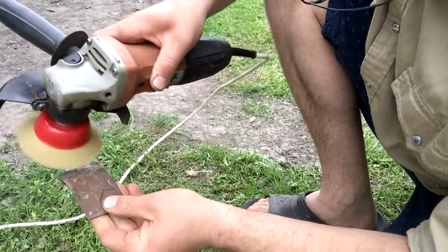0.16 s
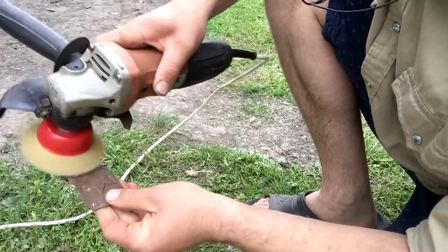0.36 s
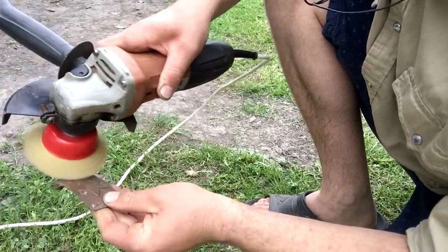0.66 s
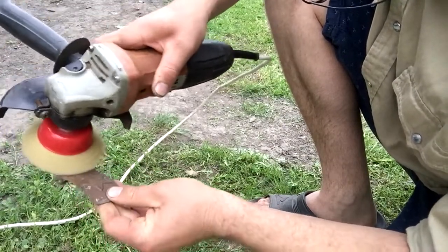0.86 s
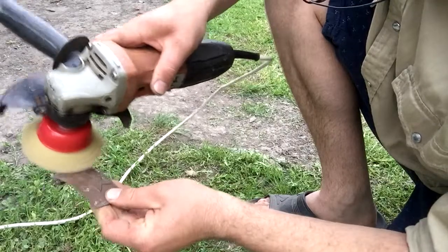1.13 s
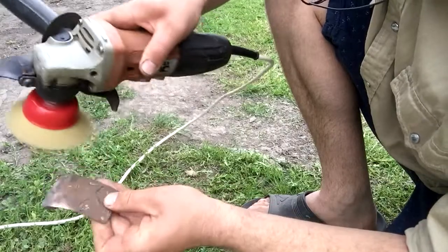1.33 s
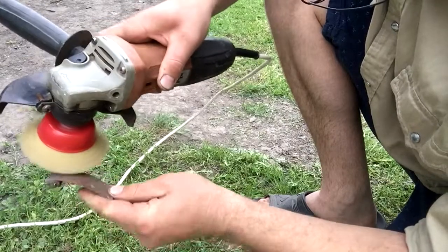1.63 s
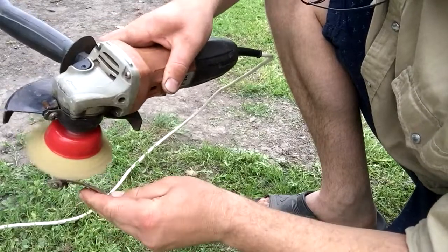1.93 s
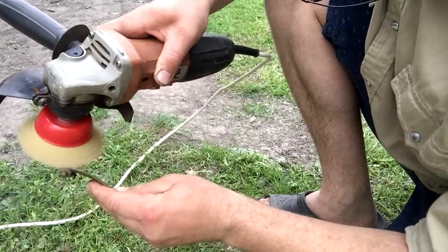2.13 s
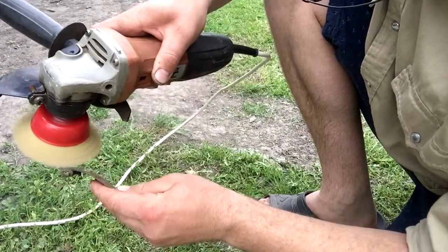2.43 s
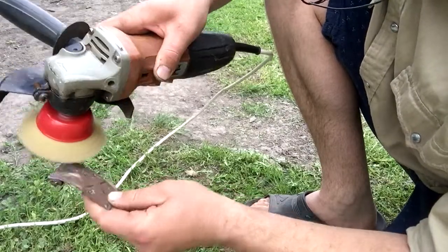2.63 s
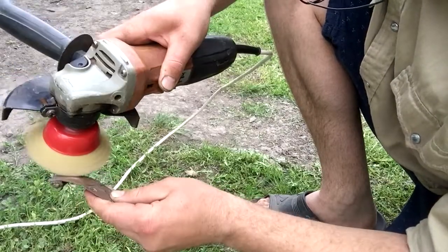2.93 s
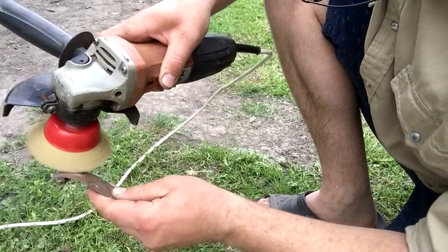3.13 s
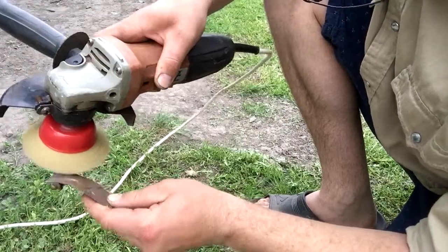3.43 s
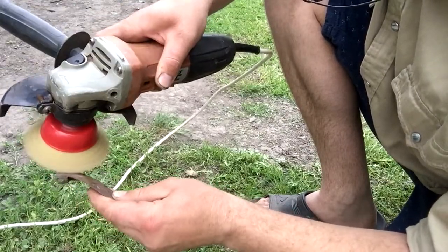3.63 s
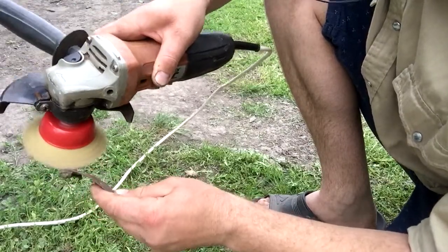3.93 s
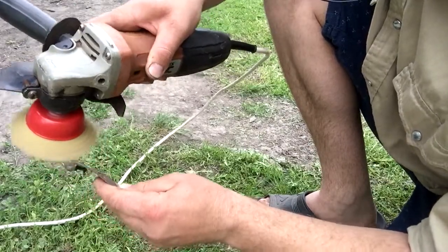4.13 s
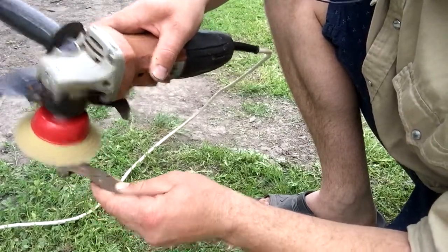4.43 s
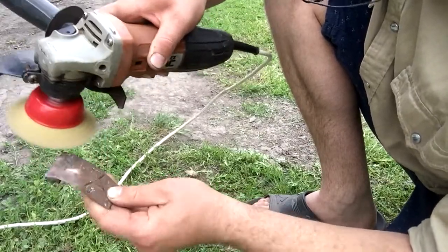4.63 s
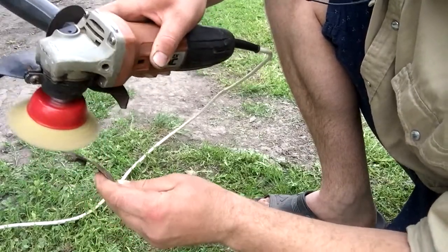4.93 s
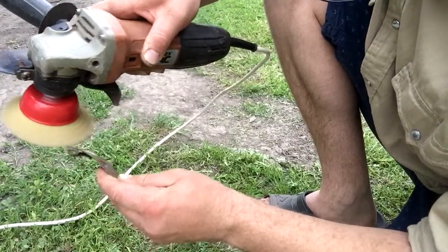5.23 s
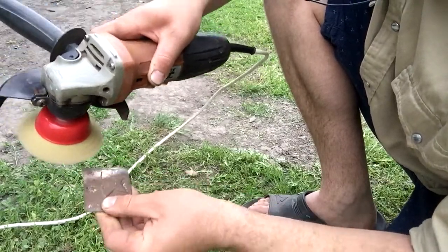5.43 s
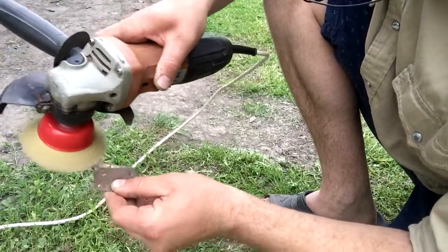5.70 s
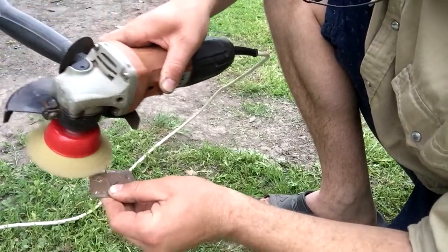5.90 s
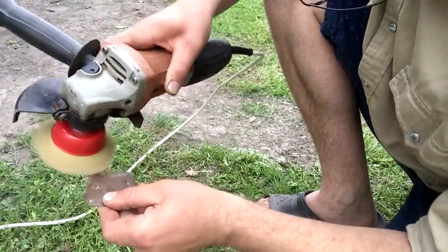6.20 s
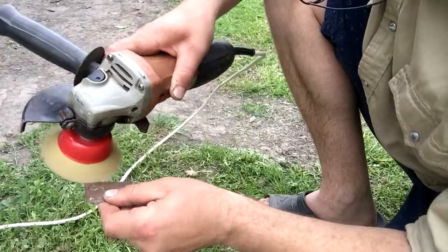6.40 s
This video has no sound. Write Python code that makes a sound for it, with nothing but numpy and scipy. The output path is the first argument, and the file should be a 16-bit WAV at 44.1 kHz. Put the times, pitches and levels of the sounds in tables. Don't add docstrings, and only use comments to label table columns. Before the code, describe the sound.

A power tool with a spinning wire brush scrubs a hand-held metal plate on open grass. The loud, metallic, buzzing whine bends down under load and springs up when released, slowly at first and then in quicker dips. A brief flicker in level comes early on, after which the rough noise is thinner. Dry sound, heard at arm's length, with no echo.

```python
import sys
import numpy as np
from scipy import signal
from scipy.fft import rfft, irfft
from scipy.io import wavfile
from scipy.ndimage import uniform_filter1d

SR = 44100
rng = np.random.default_rng(int(sys.argv[2]) if len(sys.argv) > 2 else 0)


def to_wav(s):
    ch = np.atleast_2d(s).T
    pcm = np.round(np.clip(ch, -1, 1) * 32767)
    wavfile.write(sys.argv[1], SR, pcm.astype(np.int16))


def level_to_linear(level):
    exponent = np.asarray(level, float) / 20
    return 10 ** exponent


N = 289296
STEP = 32
T = np.arange(N) / SR
T_CONTROL = T[::STEP]
HZ = np.fft.rfftfreq(N, 1 / SR)

PINION, WHEEL, BLADES = 10, 37, 31
MID_HZ = 490
RANGE_ENDS = (9.4, 10.5, 12.5, 20.5)

# start in seconds, rotor speed it settles to in Hz,
# time the change takes in seconds, fan whistle level in dB.
PUSHES = [(0.0, 508.8, 0.24, -65.5), (.507, 495.4, 0.31, -51), (.997, 490, .099, -50),
          (1.096, 510, 0.46, -50), (1.727, 449.8, 0.26, -53), (2.13, 471.8, 0.075, -55.5),
          (2.322, 484.8, .012, -51), (2.45, 479, 0.078, -49), (2.557, 518.2, .012, -58),
          (2.733, 471.3, .149, -55), (2.882, 452.7, 0.18, -50), (3.274, 470.2, 0.046, -56),
          (3.348, 514.8, .021, -63), (3.489, 460.6, 0.15, -51), (3.767, 473.5, 0.059, -53),
          (3.93, 471, 0.039, -51.5), (4.063, 475.5, 0.013, -50), (4.299, 470.4, .012, -49),
          (4.499, 518.2, 0.022, -64), (4.785, 488, .077, -58), (5.255, 516.2, .079, -56.5),
          (5.382, 519.8, .142, -56), (5.524, 485.7, 0.11, -54), (5.741, 496.8, 0.024, -53),
          (5.789, 474.6, .029, -51), (6.019, 465.7, .019, -58), (6.053, 515, .08, -56),
          (6.28, 482.2, 0.11, -59), (6.362, 445.3, .2, -57)]
# time in seconds, bearing in dB,
# lean toward the mesh order in dB, sharpness of contact in dB.
SEATS = [(0.0, 4, 1, 7), (.4, 4.5, -6, 9), (1.3, 5, 1, 6), (1.645, 4, -1.5, 3), (1.86, -2, -2.2, -7),
         (2.03, -5, 9, 7), (2.2, 1, -0.5, -7), (2.35, -0.5, 3, -7), (2.555, -3, 0.4, -8),
         (2.63, 2, 1.2, -1), (2.82, 0, -1, -12), (2.97, -0.5, 2.5, -8), (3.1, -2, 8, 12),
         (3.334, -5, -2, -11), (3.43, 2, -0.5, 6), (3.57, 0, -1, -8), (3.69, 1, 0.5, -15),
         (3.85, -0.3, 1.5, -13), (4.5, -5.5, -2.5, -5), (4.635, -1.5, 5.5, -4), (4.819, -2.5, 0, -5),
         (4.915, 1.5, -1, 12), (5.305, -4.5, -4, -8), (5.345, 0.9, 3.5, 0), (5.58, -2, -2, -10.5),
         (5.64, 3, 1, -16), (6.105, -8.5, 4, -10), (6.15, 2, -7.5, 2), (6.36, -0.3, -6, -9),
         (6.47, 0, -7, -11)]
# time in seconds, nearness over the usual in dB.
REACH = [(0.0, -1.2), (.5, 1), (1.2, 1.2), (1.45, -1.2), (1.65, 1), (1.9, 1.7), (2.1, 0.4), (2.7, 0.3),
         (3.3, 0), (3.55, 0.6), (4.0, -1), (4.6, 1), (4.82, -4.5), (5.1, 0.6), (5.55, -1.7), (5.85, 1.4),
         (6.1, 0.3), (6.45, 2.6)]
# centre in seconds, half width in seconds, depth 0-1.
GAP = (1.637, 0.0037, 0.86)

HUM_ORDERS = [
    (0, 1),
    (0, 2),
    (1, -1),
    (1, 0),
    (3, 0),
]
# level in dB, swell in dB, gain in dB per 10 Hz of slowing.
HUM_LEVELS = [(-75, 0.1, -0.7), (-70, 1, 0.28), (-73, 2.5, -1), (-61, 1.5, 0.65), (-61, 2.7, -1.35)]
WHINE_ORDERS = [(1, 2), (2, -1), (2, 0), (4, 0), (5, -1), (0, 18), (5, 0), (6, -2), (6, -1), (6, 0), (7, 0),
                (8, -3), (7, 1), (8, -2), (8, -1), (8, 0), (0, 30), (9, -3), (8, 1), (8, 2), (9, -1),
                (0, 33), (9, 0), (9, 1), (10, -2), (10, -1), (10, 0), (11, -3), (10, 1), (11, -2), (10, 2),
                (11, -1), (11, 0), (11, 1), (12, 0), (13, 0), (13, 1), (14, 0), (14, 1), (16, 0), (18, 2),
                (19, -1), (19, 0), (19, 1), (20, -1), (20, 0), (20, 1), (21, 0), (21, 1), (22, 0), (23, 0),
                (24, 0), (25, -1), (28, -1), (28, 0), (28, 1), (30, 0)]
# level in dB, gain in dB per 10 Hz of slowing.
WHINE_LEVELS = [(-84.5, -7), (-86, 5), (-79.5, 2), (-69.5, -0.5), (-80, -4), (-66.5, 0), (-75, -2),
                (-70.5, -1.5), (-72.5, -2.5), (-74.5, -3), (-70.5, -2), (-80, 1), (-81, -7), (-69, 1),
                (-87, 2), (-71.5, 2), (-75.5, -3.5), (-94, -6), (-83, -7.5), (-74, 2.5), (-60, 0.2),
                (-81.5, 5.5), (-60.5, 0.6), (-85, 5), (-70, -1), (-66, 0), (-53.5, 0), (-92, 0),
                (-63.5, -1.4), (-82, -5), (-61.5, 1), (-65.5, 4), (-52.5, -0.68), (-57, -1), (-61.5, 0),
                (-72.5, 1.5), (-76, 1), (-81, 1), (-79, -5), (-76, -1), (-91, .8), (-93, -3), (-79, 1.5),
                (-84, 0.5), (-85.5, -5.5), (-69, 0.9), (-92, 7.5), (-81.5, 3.6), (-81, -6), (-86, -8.4),
                (-85, -6), (-91, -4.3), (-87, -4.5), (-92, -2), (-94, -.3), (-88, -2), (-84, 4)]
# level in dB,
# dB per dB of bearing, dB per dB of lean, dB per dB of sharpness.
ANSWERS = [
    (0.14, 0.93, 0.01, 0.01),
    (-0.46, 0.69, 1.07, 0.01),
    (0, 1.05, 0.47, 0.06),
    (-1.5, 1.1, 0.72, 0.15),
    (-3.5, 0.9, 0.18, 0.88),
]
# level in dB, dB per dB of bearing, of lean, of sharpness.
SIDEBAND_ANSWER = (-0.32, -0.11, -0.27, 0.02)
# centre in Hz, width in Hz, level over the plain wall in dB.
HOUSING = [(823, 8, 0), (1220, 360, 7), (2675, 77, 9), (2870, 210, 8.5), (3592, 78, 21.5), (4058, 90, 20),
           (4325, 245, 15), (4617, 99, 11.5), (5178, 44, 21), (5704, 120, 7), (6050, 25, -17),
           (6450, 48, 9), (7025, 39, 10), (7200, 91, 10.5), (9000, 170, 3), (9464, 120, 10.5),
           (10130, 80, 5.5), (10870, 120, 7.5), (11500, 210, 7.5), (12400, 120, 5), (13600, 130, 6)]

# frequency in Hz, density in dB per Hz.
AIR_COLOUR = [(25, -124), (90, -114), (180, -104), (320, -96.5), (650, -97), (1000, -91.5), (1600, -88.5),
              (2400, -84), (3300, -86.5), (5000, -110)]
# frequency in Hz, density in dB per Hz.
RATTLE_COLOUR = [(2400, -110), (3300, -99.5), (4300, -87.5), (5300, -90), (5900, -91.5), (6800, -100),
                 (8000, -115)]
# frequency in Hz, density in dB per Hz.
WIRE_COLOUR = [(4500, -110), (6000, -88), (7500, -88.5), (8500, -93.5), (11000, -97), (14000, -95),
               (16000, -103)]
# level in dB, gain while the tool is nearer in dB, gain in dB per 10 Hz of slowing,
# dB per dB of bearing, dB per dB of lean.
NOISE_LEVELS = [
    (-2.5, 6, 0.13, -0.02, -0.19),
    (-2, 6, -.5, 0.02, 0.07),
    (-2, 6, -.1, 0.29, 0.14),
]


def fine(slow):
    return np.interp(T, T_CONTROL, slow)


def walk(rate_hz):
    hold = int(SR / STEP / rate_hz)
    count = len(T_CONTROL)
    held = np.repeat(rng.standard_normal(count // hold + 1), hold)
    slewed = uniform_filter1d(uniform_filter1d(held, hold), hold)
    return 1.58 * slewed[:count]


def steps(start_s, levels, ramp_s):
    jumps = np.diff(levels, prepend=0)
    ramps_s = ramp_s + 0 * start_s
    return sum(jump * np.clip((T_CONTROL - s) / r, 0, 1) for s, jump, r in zip(start_s, jumps, ramps_s))


def tone(cycles, db, wobble_db, blur_cycles):
    wander = walk(21.974)
    size = fine(np.sqrt(2) * level_to_linear(db + wobble_db * wander))
    phase = cycles + rng.random() + fine(blur_cycles * wander[::-1])
    return size * np.sin(2 * np.pi * phase)


def rotor_speed():
    start_hz, lag_s = 498.2, 0.0665
    start_s, hz, ramp_s, _ = np.transpose(PUSHES)
    keep = np.exp(-STEP / SR / lag_s)
    return start_hz + signal.lfilter([1 - keep], [1, -keep], steps(start_s, hz - start_hz, ramp_s))


def seating():
    seat_s = 0.014
    at_s, *columns = np.transpose(SEATS)
    return [steps(at_s - seat_s, column, seat_s) for column in columns]


def housing_db(hz):
    rings = sum(level_to_linear(2 * db) / (1 + (2 * (hz - centre_hz) / width_hz) ** 2) for centre_hz, width_hz, db in HOUSING)
    return 10 * np.log10(1 + rings)


def hiss(colour, turns, beat, flicker_db, pattern=0):
    ring_share = 0.82
    hz, db = np.transpose(colour)
    pulse = 1 + beat * np.cos(2 * np.pi * turns)
    noise = rng.standard_normal(N) * pulse * fine(level_to_linear(flicker_db * walk(25)))
    gain_db = np.interp(np.log(HZ + 1), np.log(hz), db) + ring_share * housing_db(HZ)
    return irfft(rfft(noise + pattern) * level_to_linear(gain_db), N) * np.sqrt(SR / 2)


def cooling_air(rotor):
    return hiss(AIR_COLOUR, rotor, beat=0.13, flicker_db=0.7)


def brush_wires(brush):
    return hiss(WIRE_COLOUR, brush, beat=0.096, flicker_db=0.73)


def tooth_flaws(rotor, brush, db):
    pinion = sum(np.sin(2 * np.pi * (n * rotor + rng.random())) for n in range(6, 14))
    wear = sum(tone(m * brush, 0, wobble_db=3.7, blur_cycles=0.044) for m in range(3, 5))
    flaws = pinion * wear
    return level_to_linear(db) * flaws / flaws.std()


def gear_rattle(rotor, brush):
    flaws = tooth_flaws(rotor, brush, db=-5)
    return hiss(RATTLE_COLOUR, brush, beat=0.2, flicker_db=0.97, pattern=flaws)


def noises(hz, rotor, brush):
    bearing_db, lean_db, _ = seating()
    near = T_CONTROL < GAP[0]
    reach_db = np.interp(T_CONTROL, *np.transpose(REACH))
    sources = [gear_rattle(rotor, brush), cooling_air(rotor), brush_wires(brush)]
    out = 0
    for source, (db, near_db, slope_db, per_bearing, per_lean) in zip(sources, NOISE_LEVELS):
        level_db = db + reach_db + near_db * near + slope_db * (MID_HZ - hz) / 10
        level_db = level_db + per_bearing * bearing_db + per_lean * lean_db
        out = out + level_to_linear(fine(level_db)) * source
    return out


def hum(hz, rotor, brush):
    out = 0
    for (n, m), (db, swell_db, slope_db) in zip(HUM_ORDERS, HUM_LEVELS):
        level_db = db + swell_db * walk(3.82) + slope_db * (MID_HZ - hz) / 10
        out = out + tone(n * rotor + m * brush, level_db, wobble_db=1.0, blur_cycles=0.028)
    return out


def fan(hz, rotor, brush):
    best_hz, below_db_per_hz, above_db_per_hz, drift_db = 484, 0.35, 0.5, 1
    start_s, _, ramp_s, aim_db = np.transpose(PUSHES)
    push_db = aim_db[0] + steps(start_s, aim_db - aim_db[0], ramp_s)
    loss_db = np.where(hz < best_hz, below_db_per_hz, above_db_per_hz) * abs(hz - best_hz)
    db = push_db - loss_db + drift_db * walk(14)
    blades = BLADES * rotor
    lower = tone(blades - brush, db - 28, wobble_db=3, blur_cycles=0.1)
    upper = tone(blades + brush, db - 13, wobble_db=3, blur_cycles=0.1)
    return tone(blades, db - 0.5 + 2.7 * walk(90), wobble_db=3.9, blur_cycles=0.16) + lower + upper


def gears(hz, rotor, brush):
    seats_db = seating()
    range_db = [db + np.dot(shares, seats_db) for db, *shares in ANSWERS]
    side_db = SIDEBAND_ANSWER[0] + np.dot(SIDEBAND_ANSWER[1:], seats_db)
    out = 0
    for (n, m), (db, slope_db) in zip(WHINE_ORDERS, WHINE_LEVELS):
        order = n + m * PINION / WHEEL
        is_sideband = n * m != 0
        level_db = db + slope_db * (MID_HZ - hz) / 10
        level_db = level_db + range_db[np.searchsorted(RANGE_ENDS, order)] + side_db * is_sideband
        level_db = level_db + housing_db(order * hz)
        out = out + tone(n * rotor + m * brush, level_db, wobble_db=1.82, blur_cycles=0.019)
    return out


def scene():
    hz = rotor_speed()
    rotor = np.cumsum(fine(hz)) / SR
    brush = rotor * PINION / WHEEL
    mix = noises(hz, rotor, brush) + hum(hz, rotor, brush) + fan(hz, rotor, brush) + gears(hz, rotor, brush)
    return mix[None]


def top_cut(x):
    return signal.sosfilt(signal.butter(12, 16780, fs=SR, output="sos"), x)


def record(dry):
    at_s, half_s, depth = GAP
    faded = dry * (1 - depth * np.exp(-((T - at_s) / half_s) ** 2))
    bass = signal.butter(2, 55, "high", fs=SR, output="sos")
    top = signal.ellip(12, 0.3, 70, 15720, fs=SR, output="sos")
    mix = signal.sosfilt(np.vstack([bass, top]), faded)
    return top_cut(mix)


dry = scene()
out = record(dry)
to_wav(out)
```